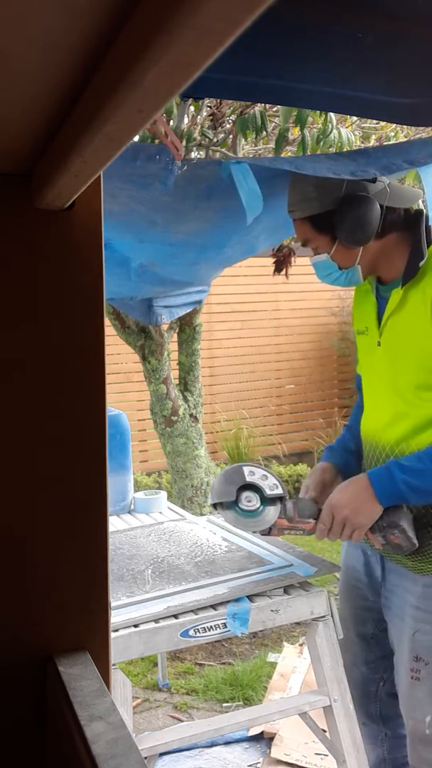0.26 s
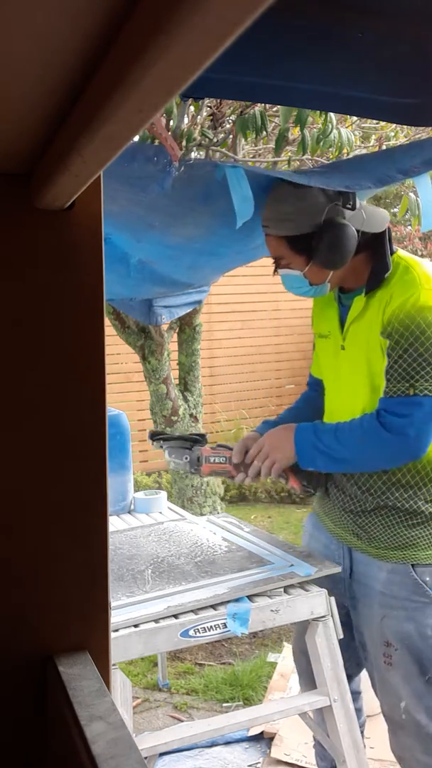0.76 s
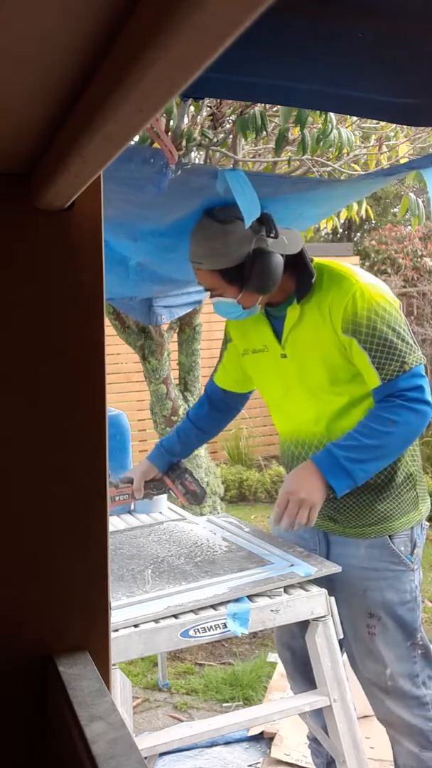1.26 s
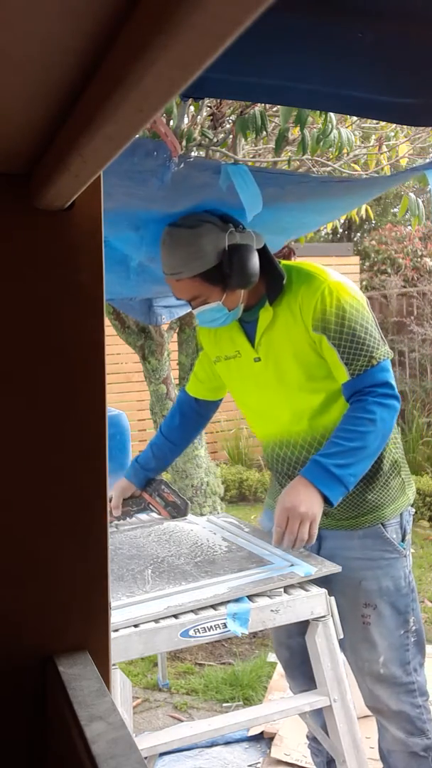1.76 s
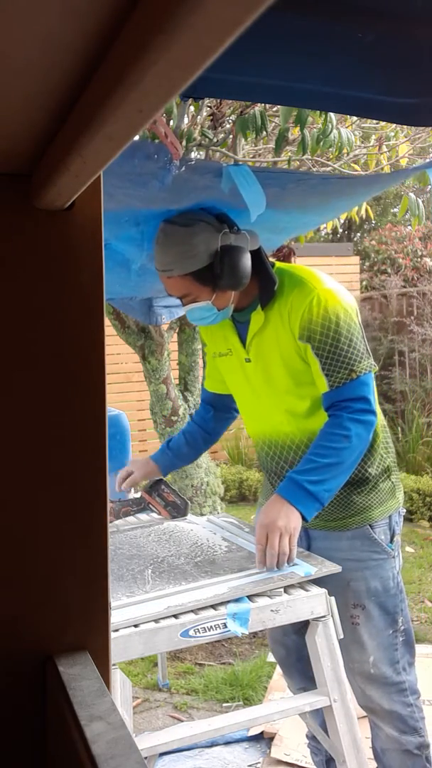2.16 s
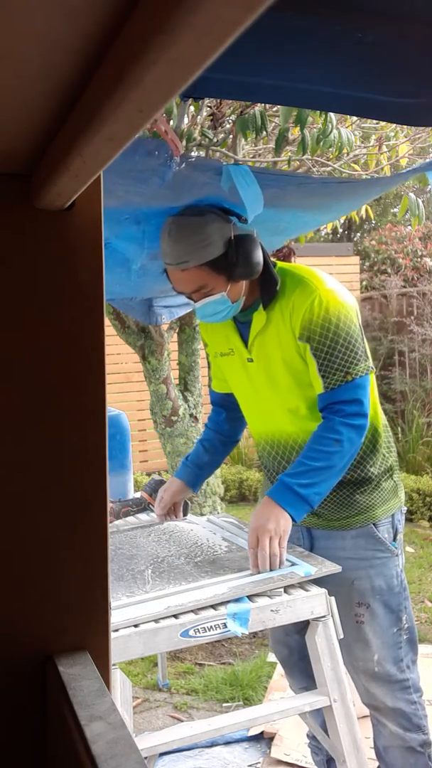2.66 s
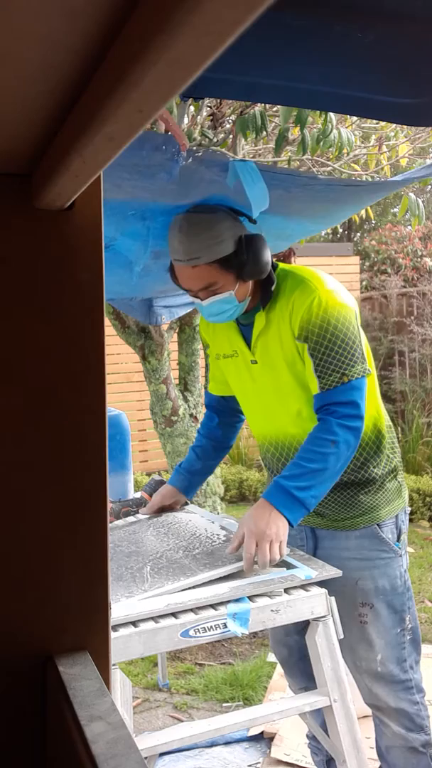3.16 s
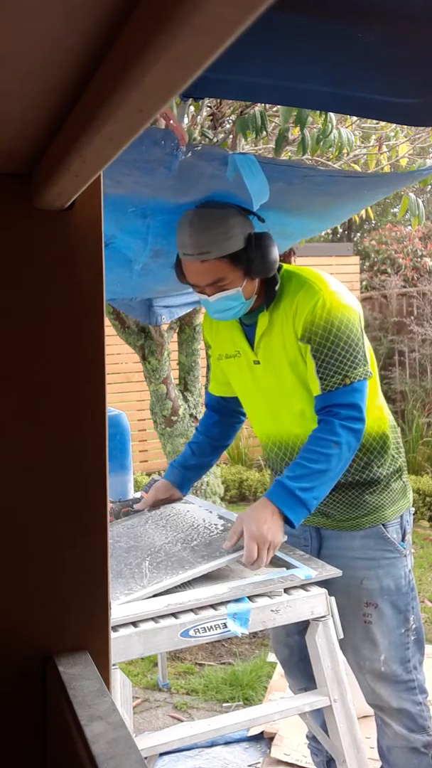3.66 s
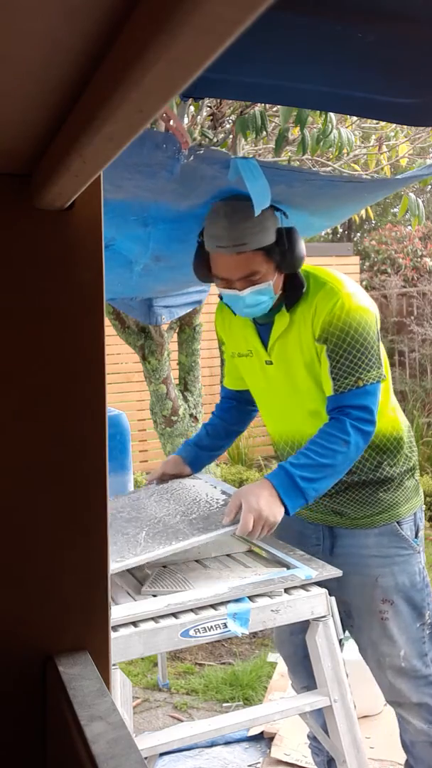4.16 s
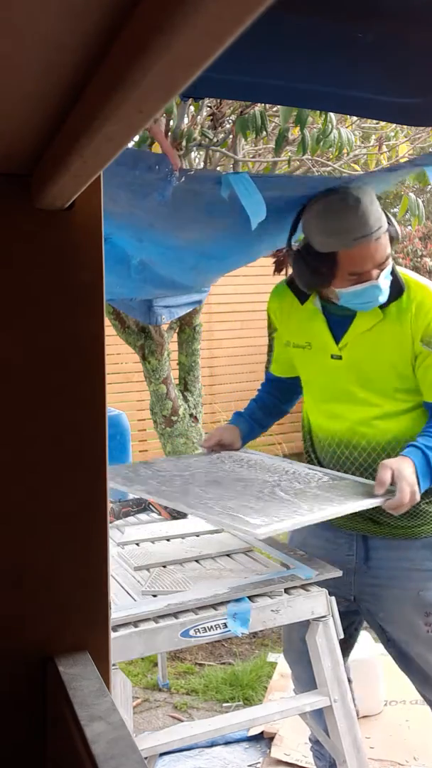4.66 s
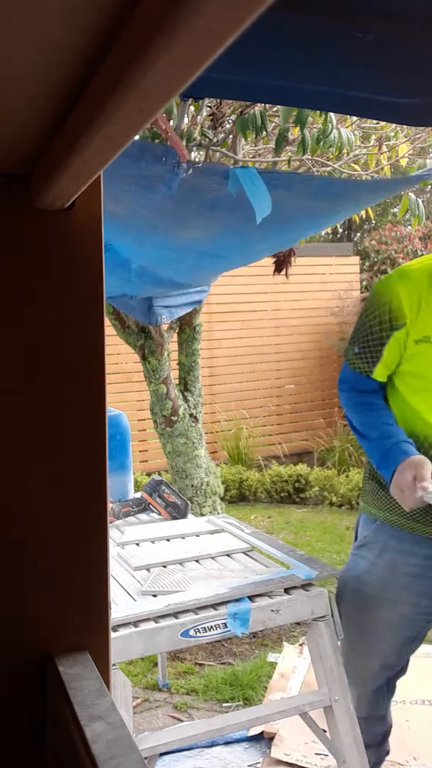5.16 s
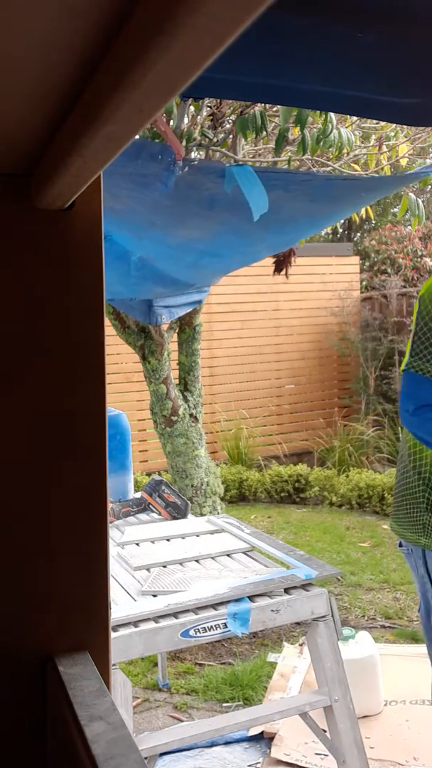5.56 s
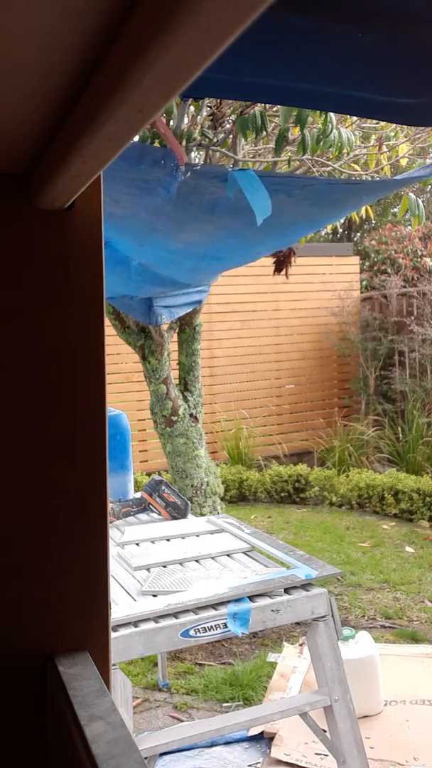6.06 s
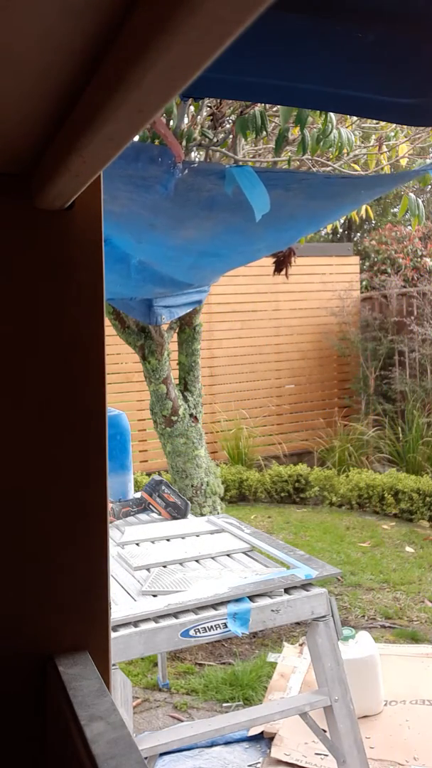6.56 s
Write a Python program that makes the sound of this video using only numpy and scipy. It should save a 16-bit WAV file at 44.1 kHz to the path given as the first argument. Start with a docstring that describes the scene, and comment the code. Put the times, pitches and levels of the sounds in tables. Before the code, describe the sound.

Coasting power tool chatters and sinks to silence, followed by metallic knocks, a sharp gritty tile clatter, quiet handling and late thumps on boards.

```python
"""A cordless angle grinder coasts down: chattering gears, a sinking whine and fan hiss, from grains and modes.
Early knocks ring the tool on its metal platform; then a tile is dragged, knocked and lifted, and heavy drops
set the rails singing. Set down further off, the tile is damped, and boards underfoot thud.
Scrapes and knocks are stick-slip grains driving ringing modes; loose metal rattles and brief whistles come between.
A phone in a doorway hears it all coloured by the frame, over a quiet garden of softly filtered noise."""
import sys
import numpy as np
from scipy import signal
from scipy.fft import rfft, irfft, next_fast_len
from scipy.io import wavfile
from scipy.ndimage import uniform_filter1d

SR = 44100
rng = np.random.default_rng(int(sys.argv[2]) if len(sys.argv) > 2 else 0)


def materialize(psi):
    """Save the field psi as 16-bit PCM at rate SR to the path in sys.argv[1].

    A 1-D psi becomes a single channel; in a 2-D psi each row is a channel.
    """
    bounded = np.clip(np.atleast_2d(psi).T, -1, 1)
    quanta = np.round(bounded * 32767).astype(np.int16)
    wavfile.write(sys.argv[1], SR, quanta)


N = 300304
SIZE = next_fast_len(N + SR)  # padded so that filtered tails do not wrap round
HZ = np.maximum(np.arange(SIZE // 2 + 1) * SR / SIZE, 1)
T = np.arange(N) / SR

# The coasting grinder. Each row: time in seconds, gear rattle level in dB, housing hum relative to it in dB,
# fan hiss relative to it in dB.
COASTING = [(0, -36.5, -10, -1), (.1, -38.5, -10, 2.5), (.33, -40.5, -8.5, -1), (.43, -39, -1.5, -4),
            (.6, -39, -7, -6), (.878, -35, -7, -7), (.888, -30.5, -8.5, -5), (.925, -27, -8.5, -5.5),
            (1.0, -37.5, -5, -4), (1.08, -40, -12, -7.5), (1.155, -49.5, -13, -7), (1.17, -52.5, -4.5, -5),
            (1.22, -61, -6, 1), (1.3, -68, -26, 10)]
# Modes of the grinder housing. Each row: frequency in Hz, width in Hz, level in dB.
HOUSING_MODES = [(825, 255, -3.5), (1164, 162, 1.5), (1352, 27, 7), (1406, 200, -3), (1840, 118, 2),
                 (2360, 200, -8)]
# Low modes of the housing hum, before a low-pass. Each row: frequency in Hz, width in Hz, level in dB.
HUM_MODES = [(345, 11.8, 32.5), (250.2, 17, -41.5), (155, 73, -25)]
# Modes of the fan hiss, before a gentle high-pass. Each row: frequency in Hz, width in Hz, level in dB.
FAN_MODES = [(2500, 700, 15.5), (5530, 600, 8), (7900, 1000, 5.5), (13200, 900, -5), (11200, 1200, -16)]
# Partials of the whine, before housing, flicker and fade. Each row: multiple of spindle speed, level in dB.
WHINE_PARTIALS = [(3, -13), (4, -13), (4.6, -20), (5.3, -21), (6.5, -17), (8, -21)]
THROB_PER_S, SPINDLE_HZ, SLOWING_PER_S = 21, 284.4, 0.88  # spindle speed at the start, then its exponential decay
WHINE_FADE_DB_S, GEARS_WANDER_DB = 16, 1.2


def grinder():
    """Source and filter: slack gear teeth and a sinking spindle whine drive the housing; the fan hisses along."""
    on, (rattle_db, hum_db, fan_db) = columns(COASTING)
    swell = np.cos(2 * np.pi * THROB_PER_S * T + 5.1)
    depth_db = 0.11 + 1.5 * (on * T) ** 3  # the slower the disc, the more unevenly the teeth meet
    throb_db = depth_db * swell

    turn = 2 * np.pi * np.cumsum(SPINDLE_HZ * np.exp(-SLOWING_PER_S * T)) / SR
    whine = np.zeros(N)
    for multiple, db in WHINE_PARTIALS:
        level = undb(db + 4 * flicker(45))
        whine += level * np.sin(multiple * turn + .6 * flicker(60))
    whine *= undb(-WHINE_FADE_DB_S * T)

    teeth = grains(1200, 3.5, .6, .8) * undb(throb_db)
    rattle = wandering(teeth, HOUSING_MODES, GEARS_WANDER_DB)
    rattle = rattle + through(whine, resonances(HOUSING_MODES))

    drone = grains(600, 2.5, 1, .95) * undb(0.42 * throb_db)
    hum = through(drone, resonances(HUM_MODES) / (1 + (HZ / 430) ** 6))

    air = grains(4800, 3.7, 0.62, 0.52) * undb(1.3 * throb_db + 2.12 * flicker(30))
    fan = through(air, resonances(FAN_MODES) * HZ / (HZ + 2500))
    return on * undb(rattle_db) * (rattle + undb(hum_db) * hum + undb(fan_db) * fan)


def handling():
    """Forced vibration: the same stick-slip grains ring the tool or tile and the deck; finer grit crunches on top."""
    slips = grains(800, 2.8, 0.51, 0.73)
    knock_force, spots = knocks(slips)
    body, platform, grit = scrapes() + knock_force
    return spots + body_ring(body, slips) + deck_ring(platform, slips) + rails() + grit_crunch(grit)


# Knocks that clatter on. Each row: time in seconds, peak force in dB, platform force relative to it in dB,
# grit force relative to it in dB, ring of the struck spot in Hz, level of that ring relative to the peak in dB.
KNOCK_EVENTS = [(0.429, -33, -4.5, 6.5, 1000, 8), (0.533, -28, -36, 3, 960, 9),
                (0.881, -16, -18, -8, 905, 14), (1.033, -27, -14, -24, 1750, 3),
                (1.064, -42, -34, -17, 1900, 28), (1.086, -32.5, -27, 4, 1735, 26.5),
                (1.113, -27, -15, -15, 800, 16.5), (1.144, -29, -23, -20, 1050, 17),
                (1.284, -63, -25, 19.5, 1780, 26), (1.545, -51, -35, 10, 2420, 23),
                (1.608, -32, 2, -5.5, 864, 23.5), (1.743, -22, 3, 8, 1840, 12),
                (1.78, -16, -33, 5, 1720, 20), (2.085, -57, 13, -24.5, 752, 29.5),
                (2.715, -63, -10, 21, 793, 28), (2.867, -27, -8, -13.5, 890, 3),
                (2.935, -46, -11, 0, 1500, 19), (3.01, -41, -30, -39, 1490, 22),
                (3.02, -32, -30, -31, 1500, 22), (3.032, -7.5, -4, -23, 1470, 10),
                (3.041, -4, -10, -8, 1050, 18), (3.05, -13, -20, -18, 1690, 24),
                (3.056, -21, -24, -30, 2090, 27), (3.065, -16.5, -25, -14, 1470, 23),
                (3.079, -7, -22, -24.5, 1040, 21.5), (3.089, -21.5, -19, -0.5, 1780, 31.5),
                (3.096, -15.5, -17, 9.5, 1570, 16.5), (3.113, -20, -15.5, 4, 2110, 34),
                (3.12, -16.5, -10.5, -5, 1468, 22), (3.131, -23, 2, -10.5, 1810, 24),
                (3.16, -34, -11.5, -4.5, 1780, 22), (3.178, -39, -6, -5, 820, 28),
                (3.2, -40, 1, -3, 1390, 6), (3.289, -32, -65, -35, 3000, 6),
                (3.293, -52, -21, -26, 4400, 16), (3.303, -44, -14, -28, 1630, 22),
                (3.371, -43.5, -27, -46, 4200, 15), (3.377, -41, 4, -28, 3000, 15),
                (3.418, -40.5, 5, 8.5, 930, 20), (3.516, -56, 0, -9.5, 1440, 13),
                (3.58, -52.5, 1, -10, 1900, 17), (3.533, -47.5, 13.5, -32, 930, 7),
                (3.605, -57.5, 12.5, -35, 1454, 15), (3.785, -55, 1.5, -27.5, 930, 16),
                (3.884, -62.5, 4, -21.5, 1400, 17), (3.955, -63.5, 1, -19.5, 890, 15.5),
                (4.075, -62.5, 10, 5, 999, 12), (4.829, -61, -27.5, -12.5, 1945, 27.5),
                (5.088, -50.5, -11, 4.5, 1030, 20), (5.442, -42, -3, -7.5, 845, 14),
                (5.495, -54, -22, 1, 1360, 32), (5.522, -44.5, 2, -15, 1540, 23),
                (5.58, -56, -49.5, -3, 1410, 27.5), (5.638, -43.5, -25.5, 12.5, 1434, 29.5),
                (5.649, -47.5, -25.5, 18.5, 2200, 32), (5.793, -45.5, -34.5, 1, 880, 8),
                (5.863, -31, -28, 12, 1010, 23.5), (5.874, -31.5, -21.5, 8, 1770, 32.5),
                (5.887, -52, -36, -1, 1470, 49), (5.905, -54.5, 11, -8, 910, 17),
                (5.99, -46.5, -29.5, -13, 1380, 18.5), (6.206, -52, -16.5, -22, 864, 13),
                (6.357, -40.5, 4, -21, 728, 34), (6.396, -49, 10, -14.5, 1660, 34),
                (6.45, -50, 3, 9, 800, 12), (6.504, -56, -5, -7, 825, 27), (6.557, -63, 11, -10, 840, 4),
                (6.674, -16, 9, -43, 716, 18.5), (6.694, -35, -12, 9, 810, 35.5),
                (6.726, -35, -5, -8, 740, 34.5), (6.748, -21.5, 2, -11, 760, 22),
                (6.799, -33.5, -10, -1, 1900, 29.5)]
RISE_S = 0.0057
# rattle after the first touch: level relative to the peak, steady time, decay time
CLATTER_DB, CLATTER_S, CLATTER_T60_S = -13, 0.007, 0.098
BLOW_DB = 14.5  # first touch, above the listed ring level
SPOT_Q, SPOT_FADE_DB_S = 5.2, 350  # sharpness of each of two filters; the spot dies sooner than the rattle


def knocks(slips):
    """Impact excitation: a rising, decaying force on body, platform and grit, and a ring of the struck spot."""
    force, spots = np.zeros((3, N)), np.zeros((2, N))
    for s, peak_db, platform_db, grit_db, hz, spot_db in KNOCK_EVENTS:
        span = slice(int(s * SR), int(s * SR) + SR // 4)
        age = T[span] - T[span][0]
        decay_db = CLATTER_DB - 60 * np.maximum(age - CLATTER_S, 0) / CLATTER_T60_S
        clatter = np.minimum(age / RISE_S, 1) * undb(decay_db)
        force[:, span] += undb(peak_db) * clatter * undb([[0], [platform_db], [grit_db]])

        blow = undb(BLOW_DB) * (age == 0)  # the first touch is one clean tap
        rubbing = clatter * undb(-SPOT_FADE_DB_S * age) * slips[:, span]
        ring = signal.iirpeak(hz, SPOT_Q, SR)
        once = signal.lfilter(*ring, rubbing + blow)
        spots[:, span] += undb(peak_db + spot_db) * signal.lfilter(*ring, once)
    return force, spots


# Scrapes of tool, tile and feet. Each row: time of full strength in seconds, force in dB, swell in seconds,
# hold in seconds, fade in seconds, platform force relative in dB, grit force relative in dB.
SCRAPE_EVENTS = [(1.298, -74, 0.22, 0.087, 0.3, -13.5, 4.5), (1.469, -49.5, 0.19, 0.061, 0.15, -57, 0.5),
                 (1.613, -40, 0.0081, 0.025, 0.19, 6.5, -13.5),
                 (1.737, -33.5, 0.023, 0.11, 0.044, -2, -5.5), (1.883, -46, 0.12, 0.007, 0.16, 5, -51.5),
                 (2.487, -76, 0.12, 0.025, 0.38, -4.5, -5.5),
                 (2.747, -64.5, 0.043, 0.17, 0.27, 10.5, -12.5),
                 (2.868, -57.5, 0.0086, 0.0052, 0.6, 1, -1.5), (3.053, -22, 0.038, 0.055, 0.13, -10, 0.5),
                 (3.158, -47, 0.066, 0.29, 0.1, 1, -41), (3.496, -65, 0.1, 0.11, 0.24, 8.5, -32.5),
                 (3.801, -65, 0.12, 0.0094, 0.13, 1, -18), (3.939, -71.5, 0.07, 0.14, 0.21, -4, -10),
                 (4.605, -65.5, 0.48, 0.27, 0.12, -21.5, 3.5), (5.089, -62, 0.1, 0.018, 0.2, -14.5, -3.5),
                 (5.501, -54, 0.11, 0.017, 0.031, -20.5, 1.5),
                 (5.665, -67.5, 0.16, 0.033, 0.059, -18, 15.5),
                 (5.866, -57.5, 0.077, 0.052, 0.081, -13.5, 14.5),
                 (6.226, -63.5, 0.27, .03, 0.16, -15, -19.5), (6.299, -79.5, 0.039, 0.024, 0.91, -22, 18),
                 (6.381, -43.5, 0.013, 0.0072, 0.11, 7, -8.5),
                 (6.621, -42, 0.13, 0.04, 0.089, -12.5, -11.5), (6.702, -40.5, 0.018, 0.19, .1, 8.5, -3.5),
                 (6.808, -27, 0.037, .02, .1, -22, -13)]
SWELL_DB = 30  # drop over one swell or fade time
FIDGET_DB, FIDGET_PLATFORM_DB, FIDGET_GRIT_DB = -84.5, 4.5, -12.5  # hands and feet never quite still


def scrapes():
    """Friction envelopes: force on body, platform and grit swells, holds and fades exponentially."""
    force = undb(FIDGET_DB + np.array([[0], [FIDGET_PLATFORM_DB], [FIDGET_GRIT_DB]])) * np.ones(N)
    for s, db, swell, hold, fade, platform_db, grit_db in SCRAPE_EVENTS:
        away = np.maximum(s - T, 0) / swell + np.maximum(T - s - hold, 0) / fade
        force = force + undb(db - SWELL_DB * away) * undb([[0], [platform_db], [grit_db]])
    return force * undb(1.0 * flicker(25))  # rubbing catches and slips unevenly


# Modes of the tool lying on the deck. Each row: frequency in Hz, width in Hz, level in dB.
TOOL_MODES = [(554, 64, -9.5), (754, 89, -2), (1010, 160, -3), (1400, 120, 2), (1810, 130, -2),
              (2200, 300, -4.5), (3380, 1100, -16.5)]
# Modes of the tile held free. Each row: frequency in Hz, width in Hz, level in dB.
TILE_MODES = [(507, 31, -8), (690, 44, -9.5), (778, 31, 0), (843, 22, 2), (1044.5, 50, 2), (1087, 21, 5.5),
              (1250, 220, -7.5), (1490, 110, 5), (1660, 25, -3), (1808, 45, 2.5), (1900, 25, -4),
              (2090, 29, -0.5), (2250, 120, -4), (2602, 350, -10), (3545, 270, -12.5)]
# Damped modes of the tile set on the ground. Each row: frequency in Hz, width in Hz, level in dB.
GROUNDED_MODES = [(715, 115, 6.5), (925, 47, 14.5), (1380, 162, 10.5), (1910, 142, 2), (2340, 97, -3.5)]
# Colour of light rubbing under the hand, which hardly rings. Each row: frequency in Hz, density in dB per Hz.
RUBBED_COLOUR = [(300, -28), (550, -22), (800, -2), (1050, 1), (1250, -1.5), (1500, 2.5), (1850, -3.5),
                 (2300, -13), (3200, -22.5), (6000, -32.5)]
PICKED_S, GROUNDED_S = 2, 5.3  # the tile is picked up, then set on the ground
LIGHT_DB, TILE_WANDER_DB = -49, 2.2  # force at which firm and light contact share equally


def body_ring(force, slips):
    """Modal response: grains ring the tool, then the tile; light contact hardly rings, and the ground damps."""
    shaken = force * slips
    free = T < GROUNDED_S
    firm = force / (force + undb(LIGHT_DB))
    held = free & (T > PICKED_S)
    tool = through((T < PICKED_S) * firm * shaken, resonances(TOOL_MODES))
    tile = wandering(held * firm * shaken, TILE_MODES, TILE_WANDER_DB)
    rubbed = through(free * (1 - firm) * shaken, unit(slope(RUBBED_COLOUR)))
    grounded = through(~free * shaken, resonances(GROUNDED_MODES))
    return tool + tile + rubbed + grounded


# Modes of the metal platform, before a bass cut. Each row: frequency in Hz, width in Hz, level in dB.
PLATFORM_MODES = [(126, 180, 1), (205, 13, 7), (259, 51, 2), (325.5, 15, 8.5), (350.7, 14, 4.5),
                  (262, 310, -4)]
# Modes of the boards underfoot, before a bass cut. Each row: frequency in Hz, width in Hz, level in dB.
BOARD_MODES = [(106.8, 22, 5.5), (261, 79, 3), (346, 30, 5), (546, 69, -9.5)]


def deck_ring(force, slips):
    """Plate radiation: the platform, later the boards underfoot, ring with their deep bass weakened."""
    free = T < GROUNDED_S
    heavy = force * slips.mean(axis=0)
    thin = 1j * HZ / (1j * HZ + 140)  # a thin deck radiates little deep bass
    platform = through(free * heavy, resonances(PLATFORM_MODES) * thin ** 2)
    return platform + through(~free * heavy, resonances(BOARD_MODES) * thin)


# Platform rails singing after heavy drops. Each row: start in seconds, frequency in Hz, starting level in dB
# before flicker, decay time T60 in seconds.
RAIL_TONES = [(1.85, 313.6, -55.5, 1.7), (3.15, 518.7, -43.5, 1)]


def rails():
    """Free decay: each lightly damped rail sings one sine that dies exponentially."""
    sound = np.zeros(N)
    for s, hz, db, t60 in RAIL_TONES:
        age = np.maximum(T - s, 0)  # the sine is silent while age is zero
        level = undb(db - 60 * age / t60 + 2.6 * flicker(35))
        sound += level * np.sin(2 * np.pi * hz * age)
    return sound


# Colour of crunching grit, before its split into coarse and fine. Each row: frequency in Hz, density in dB per Hz.
GRIT_COLOUR = [(1400, -25), (2400, -8.5), (3500, -16), (4800, -11), (6000, -14.5), (7700, -11),
               (10500, -11.5), (16000, -10.5)]


def grit_crunch(force):
    """Granular fracture: heavy contact crushes coarser grit, so the finest crunch grows more slowly."""
    crunch = grains(2500, 3, .8, .5) * undb(3.3 * flicker(50))
    fine = 1 / (1 + (7000 / HZ) ** 4)
    colour = unit(slope(GRIT_COLOUR))
    coarse = through(force * crunch, colour * (1 - fine))
    return coarse + through(undb(-35.5) * force ** 0.5 * crunch, colour * fine)


# Bursts of loose metal parts rattling. Each row: start in seconds, length in seconds, level in dB.
JINGLE_EVENTS = [(.428, .06, -38.5), (.535, .012, -46), (5.04, .05, -74), (5.12, .09, -70)]
# Modes of those small parts. Each row: frequency in Hz, width in Hz, level in dB.
JINGLE_MODES = [(5960, 45, 0), (6740, 45, 1), (7920, 60, -6), (8700, 50, -5), (13800, 80, -20),
                (15570, 45, -6)]


def jingles():
    """Modal response: gated grains shake thin metal parts into their high, narrow modes."""
    shaken = sum(undb(db) * ((T > s) & (T < s + length)) for s, length, db in JINGLE_EVENTS)
    return through(shaken * grains(190, 0.89, 1.0, 1.0), resonances(JINGLE_MODES))


# Short whistles and squeaks. Each row: start in seconds, length in seconds, starting frequency in Hz,
# glide reached at the end in Hz, level in dB, flicker share from 0 to 1.
WHISTLE_EVENTS = [(0.622, 0.011, 5650, -5, -40.5, 0.9), (0.951, 0.049, 5500, -6, -41, 1),
                  (1.002, 0.018, 5490, 8, -35.5, 0.6), (1.048, 0.028, 5260, 30, -38, 0.6),
                  (1.109, 0.02, 5430, 6, -41.5, 0.7), (1.135, 0.012, 7900, -8, -43, 0.8),
                  (2.37, 0.125, 2660, 121, -66, 0.8), (2.477, 0.23, 718, -38, -58.5, 0.08),
                  (4.083, 0.075, 11860, -2, -61.5, 0.6), (4.395, 0.11, 663, -4.5, -64.5, 0.05),
                  (6.08, 0.08, 2537, -14.5, -59, 1), (6.624, 0.064, 4660, -20, -52.5, 0)]


def whistles():
    """Amplitude and phase modulation: each brief gliding sine flickers in level and pitch."""
    waver, drift = flicker(150), flicker(90)
    sound = np.zeros(N)
    for s, length, hz, glide, db, share in WHISTLE_EVENTS:
        part = np.clip((T - s) / length, 0, 1)
        turn = 2 * np.pi * length * (hz * part + glide * part ** 4 / 4)
        envelope = undb(db) * np.sin(np.pi * part) ** 1.4
        uneven = 1 - share + share * waver
        sound += envelope * uneven * np.sin(turn + 2.8 * share * drift)
    return sound


# Colour of the quiet garden. Each row: frequency in Hz, relative density in dB per Hz.
GARDEN_COLOUR = [(20, -44.5), (50, -1), (100, -5.5), (200, -15), (330, -12.5), (490, -22.5), (640, -10),
                 (800, -4.5), (1150, -27.5), (1600, -29.5), (2800, -53.5), (8000, -32.5), (15800, -39)]
GARDEN_DB = -76.5  # before the doorway


def garden():
    """Filtered noise: a steady ambience whose level drifts slowly and slightly."""
    noise = through(grains(890, 1.3, 1.1, .9), unit(slope(GARDEN_COLOUR)))
    return undb(GARDEN_DB + 0.66 * flicker(1.6)) * noise


# Balance of the two ports. Each row: frequency in Hz, left minus right in dB.
PORT_BALANCE = [(60, -3.5), (110, -2.5), (200, -5.5), (380, -9.5), (700, -8.5), (1290, -12), (2380, -2.5),
                (4400, 2), (8120, 2.5), (15000, 6.5)]
DOORWAY_T60_S, DOORWAY_DB = .1, -8  # echo decay, and echo level relative to direct sound
BASS_WASH = .3  # gain of the echoes alike at both ports


def doorway():
    """Early reverberation: direct sound and a short wash of echoes, alike at the two ports only in the bass."""
    age = np.arange(SR // 3) / SR
    echoes = rng.standard_normal((3, len(age))) * undb(-60 * age / DOORWAY_T60_S) * (age > .002)
    wash = rfft(echoes / np.sqrt(np.sum(echoes[0] ** 2)), SIZE) * undb(DOORWAY_DB)
    middle = 1 / (1 + (800 / HZ) ** 4) / (1 + (HZ / 2000) ** 4)
    # the left port gets the sound a little earlier; the right gets the middle range by an inverted detour
    left = np.exp(2j * np.pi * HZ * 0.00014)
    right = 1 - middle - middle * np.exp(-2j * np.pi * HZ * 0.00073)
    alike = 1 / (1 + (HZ / 600) ** 4)
    ports = np.array([left, right]) * (1 + BASS_WASH * alike * wash[0])
    ports = ports + np.sqrt(1 - alike ** 2) * wash[1:]
    tilt = np.sqrt(slope(PORT_BALANCE))  # half the difference in dB to each port
    return ports * np.array([tilt, 1 / tilt]) / np.sqrt(1 + undb(2 * DOORWAY_DB)) * undb(3.5)


def undb(db):
    """Logarithmic level: decibels to gain."""
    return 10 ** (np.asarray(db) / 20)


def unit(response):
    """Power normalisation: scales a response so that white noise keeps its level."""
    return response / np.sqrt(np.mean(np.abs(response) ** 2))


def mode(hz, width, db):
    """Simple resonance: the frequency response of one ringing mode."""
    return undb(db) / (1 + 1j * (HZ - hz ** 2 / HZ) / width)


def signed_modes(table):
    """Alternating polarity: ringing modes with neighbours in opposite sign."""
    return [(-1) ** k * mode(*row) for k, row in enumerate(table)]


def resonances(table):
    """Modal superposition: the normalised sum of ringing modes."""
    return unit(sum(signed_modes(table)))


def wandering(x, table, depth_db, count=5):
    """Position-dependent coupling: the contact moves, so each family of modes is driven now harder, now softer."""
    modes = signed_modes(table)
    heard = 0
    for k in range(count):
        drive = x * undb(depth_db * flicker(12))
        heard = heard + sum(modes[k::count]) * rfft(drive, SIZE)
    return irfft(heard, SIZE)[..., :N] / np.sqrt(np.mean(np.abs(sum(modes)) ** 2))


def slope(table):
    """Spectral shaping: gain along points in Hz and dB, straight on a logarithmic frequency axis."""
    hz, db = np.transpose(table)
    return undb(np.interp(np.log(HZ), np.log(hz), db))


def through(x, response):
    """Linear filtering: multiplies the spectrum of a sound by a response."""
    return irfft(rfft(x, SIZE) * response, SIZE)[..., :N]


def columns(table):
    """Linear interpolation: curve rows to one value per sample, with a smoothed gate over the table's span."""
    s, *rest = np.transpose(table)
    inside = uniform_filter1d(1. * ((T >= s[0]) & (T <= s[-1])), 2000, mode="nearest")
    return inside, [np.interp(T, s, c) for c in rest]


def grains(rate, spread_db, smooth, shared):
    """Shot noise: random clicks of unequal size over smooth noise, rms 1, partly shared by the two ports."""
    size_db = spread_db * np.minimum(rng.exponential(size=N), 4)
    size = (rng.random(N) < rate / SR) * undb(size_db)
    clicks = size / size.std() * np.sign(rng.standard_normal((3, N)))
    x = clicks + smooth * rng.standard_normal((3, N))
    x = shared * x[0] + np.sqrt(1 - shared ** 2) * x[1:]
    return x / x.std()


def flicker(rate):
    """Low-passed randomness: smooth chance with spread 1, averaged twice over 1 / rate seconds."""
    width = int(SR / rate)
    x = uniform_filter1d(uniform_filter1d(rng.standard_normal(N), width), width)
    return x / x.std()


def scene():
    """Superposition: every source adds and sounds through the doorway."""
    sources = grinder() + handling() + jingles() + whistles() + garden()
    return through(sources, doorway())


def record(dry):
    """Saturation and band-limiting: the phone rounds the loudest peaks, drops the deepest bass and cuts the top."""
    rounded = np.tanh(.9 * dry) / .9
    thin = signal.sosfilt(signal.butter(2, 40, "high", fs=SR, output="sos"), rounded)
    return signal.sosfilt(signal.ellip(10, .2, 60, 15850, fs=SR, output="sos"), thin)


dry = scene()
out = record(dry)
materialize(out)
```